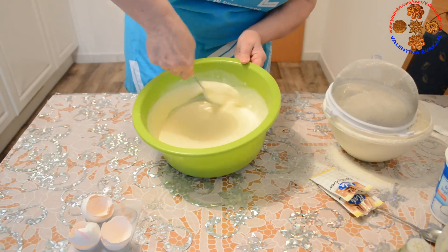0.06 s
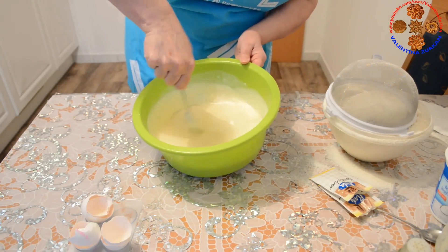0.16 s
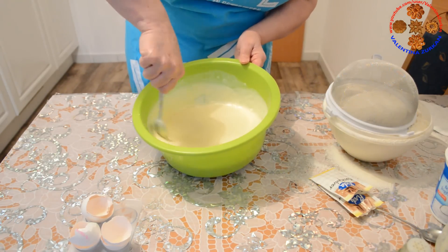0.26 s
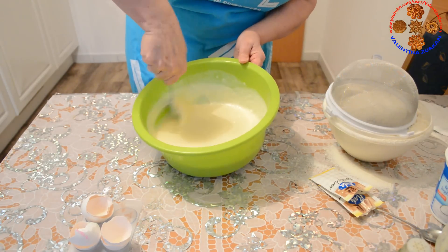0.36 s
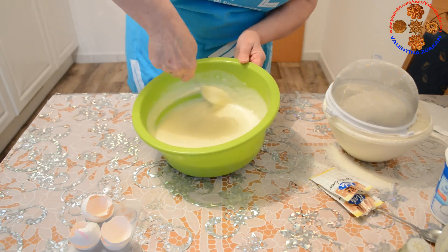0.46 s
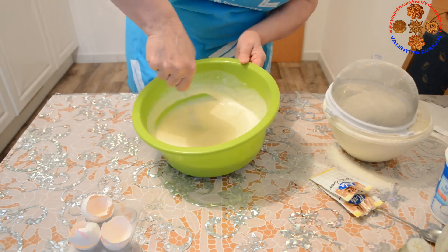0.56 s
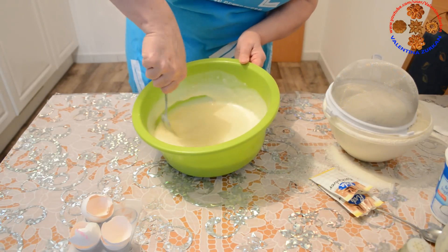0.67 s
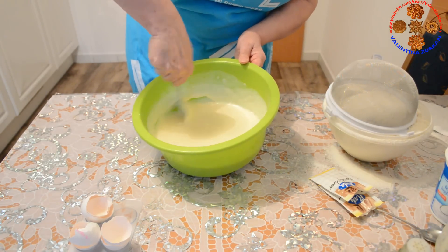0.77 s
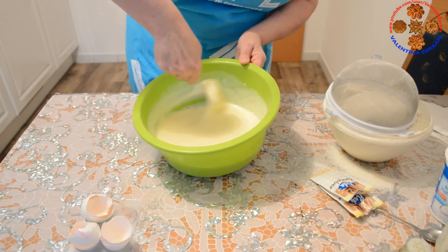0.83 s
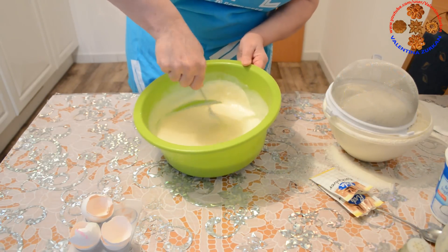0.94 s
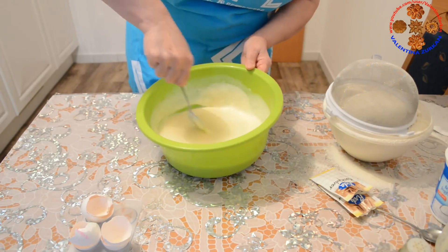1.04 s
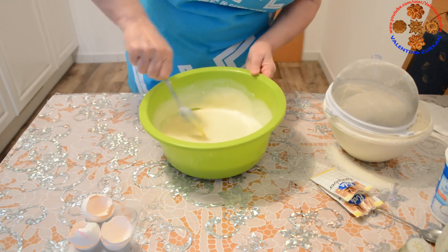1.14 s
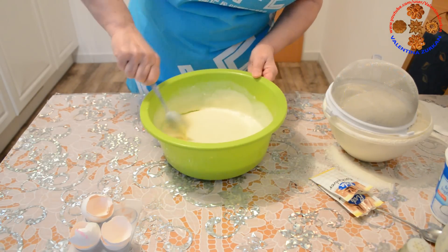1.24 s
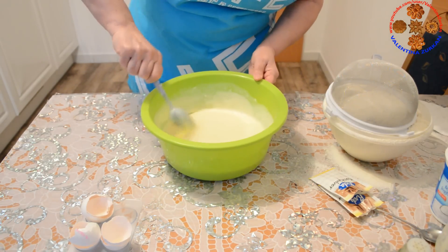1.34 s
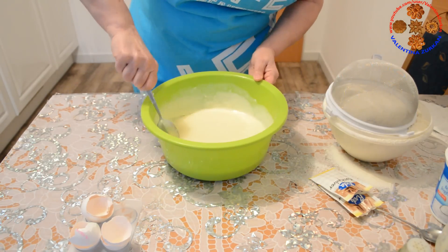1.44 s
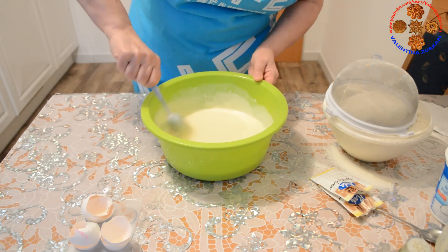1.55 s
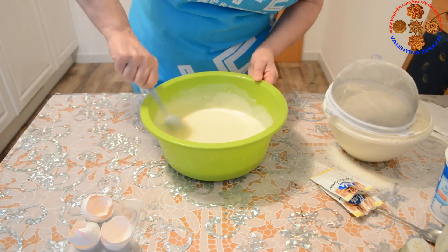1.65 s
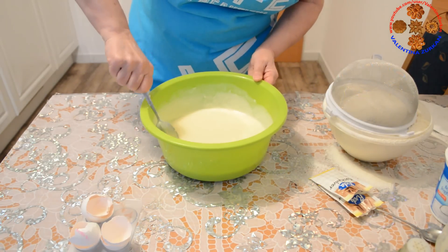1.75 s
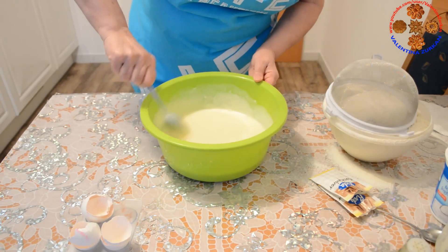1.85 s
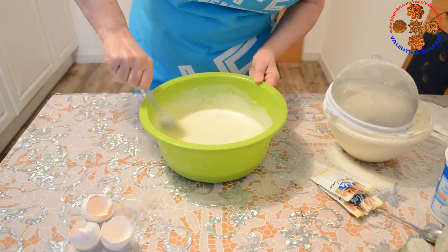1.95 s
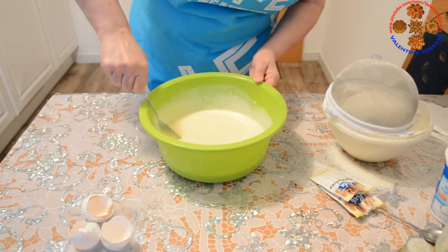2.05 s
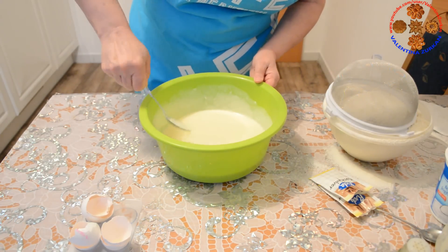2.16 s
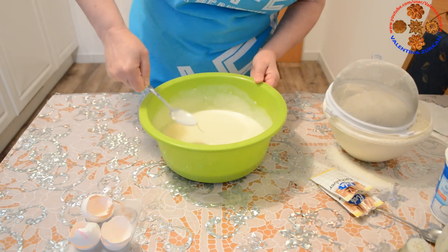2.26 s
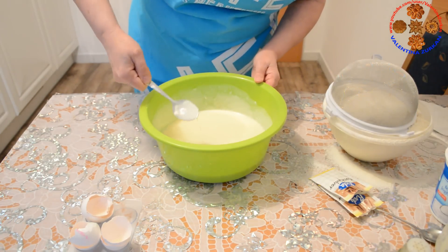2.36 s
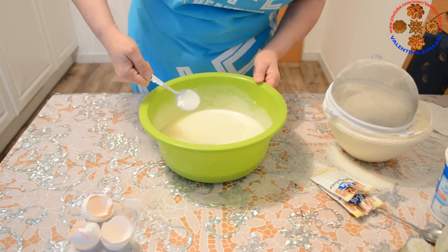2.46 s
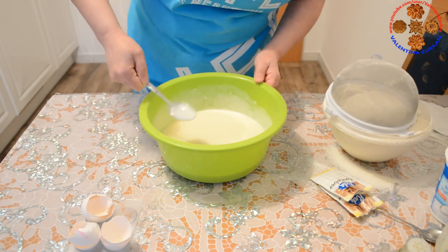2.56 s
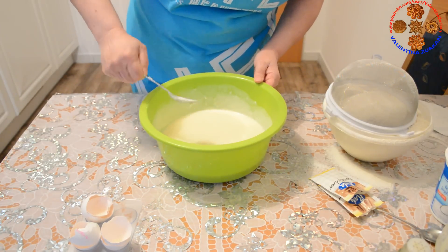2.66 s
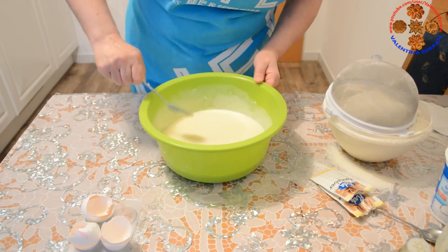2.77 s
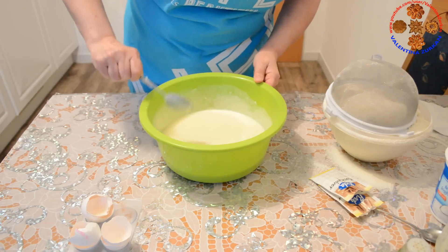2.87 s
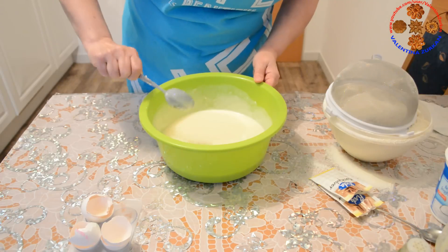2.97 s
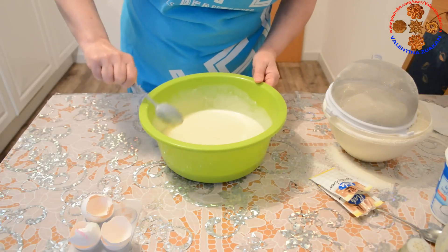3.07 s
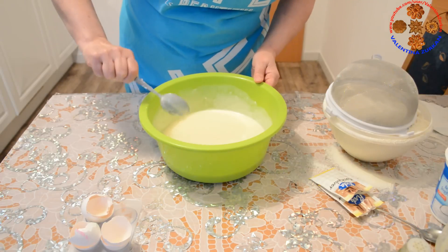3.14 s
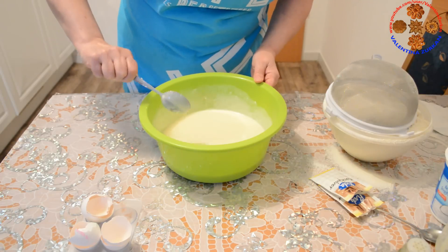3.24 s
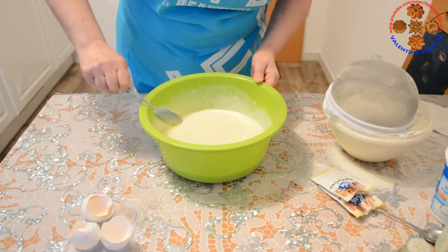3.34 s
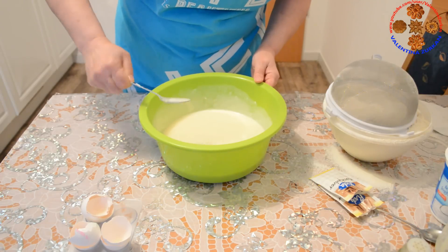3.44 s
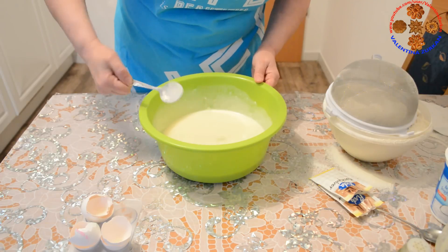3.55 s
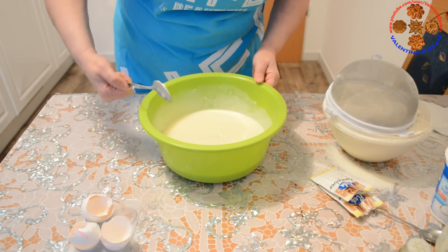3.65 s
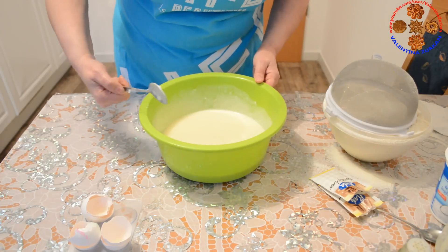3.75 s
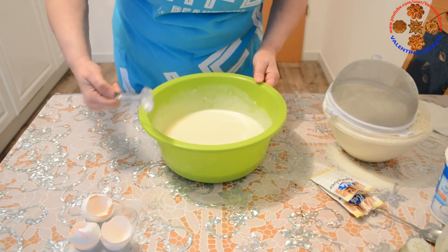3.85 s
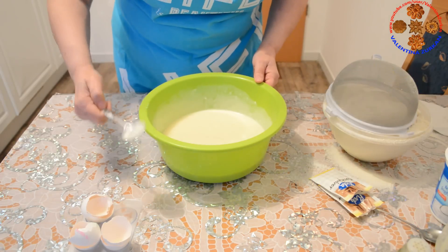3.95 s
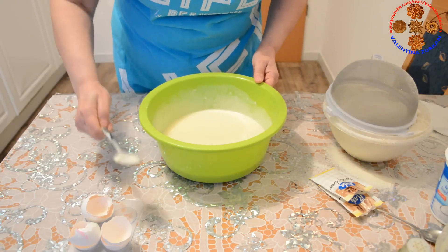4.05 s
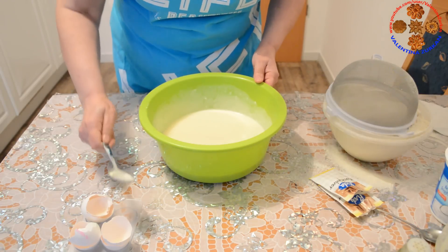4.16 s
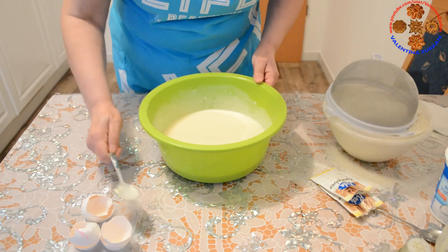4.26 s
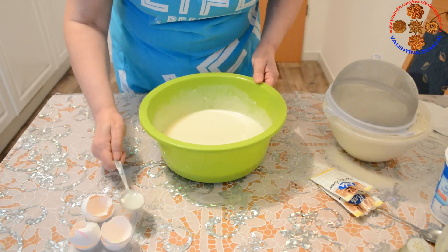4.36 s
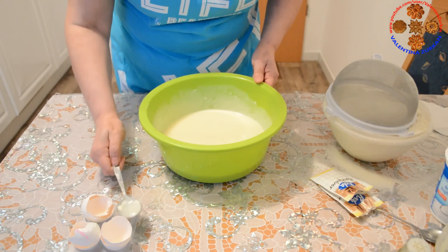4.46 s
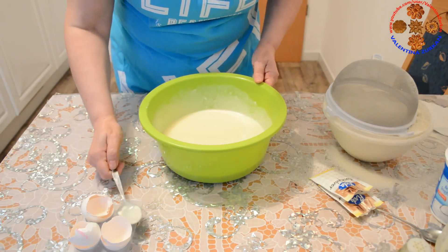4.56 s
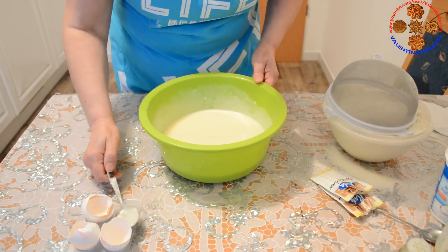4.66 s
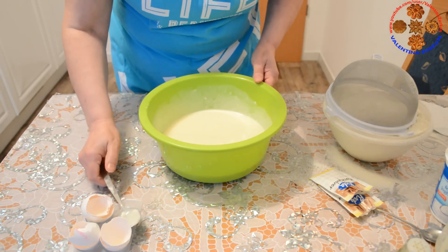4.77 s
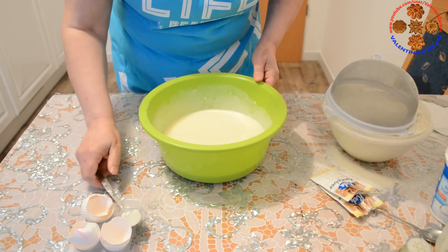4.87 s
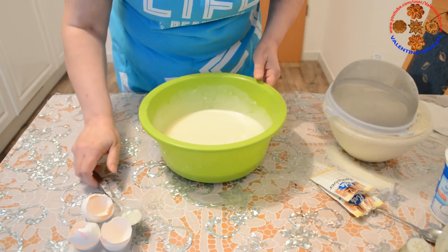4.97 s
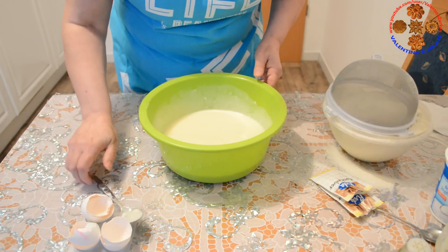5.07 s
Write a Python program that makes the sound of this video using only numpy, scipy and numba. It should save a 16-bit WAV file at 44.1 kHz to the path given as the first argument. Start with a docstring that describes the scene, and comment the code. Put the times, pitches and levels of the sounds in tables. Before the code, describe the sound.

Close, slightly overloaded sound of a spoon stirring batter: raspy scrapes and clacks against a plastic bowl, then a steady run of six sharp rim knocks. After a short gap come three fuller, hollow knocks, near silence, and a bright double metallic clink as the spoon is laid down. Short bright room echoes over quiet hum and hiss.

```python
"""A hard-walled kitchen: a metal spoon stirs batter in a plastic bowl, scraping and knocking its wall,
is wiped on the rim and rapped there in two bursts, then laid on the table.
Blows ring decaying modes with filtered-impulse cracks; scrapes and wipes are shaped noise grains and noise.
Each part of a blow has its own noise-built echoes, over a quiet appliance drone, hum and hiss.
A limiter and clipping flatten the loudest raps."""
import sys
import numpy as np
from scipy import signal
from scipy.fft import rfft, irfft
from scipy.io import wavfile
from scipy.ndimage import uniform_filter1d
from numba import njit

SR = 44100
rng = np.random.default_rng(int(sys.argv[2]) if len(sys.argv) > 2 else 0)


def bounce(signal):
    """Save signal as a 16-bit WAV file at the path given by the first command-line argument."""
    frames = np.transpose(np.atleast_2d(signal))
    limited = np.clip(frames, -1, 1)
    pcm = np.round(limited * 32767).astype(np.int16)
    wavfile.write(sys.argv[1], SR, pcm)


N = 225305  # length [samples]

BOTTOM, WALL, NEAR_RIM, FAR_RIM = range(4)  # where the spoon meets the bowl
BOWL_END, HANDLE = range(2)  # which end of the spoon lands
# every part of a blow leaves in its own direction, so each row meets its own set of echoes
EVEN_MODES, ODD_MODES, KNOCK, SNAP, REBOUND, RUB = range(6)


def undb(db):
    """Decibels to gain."""
    return 10 ** (np.asarray(db) / 20)


def level(x, db):
    """Scale to an rms level in dB."""
    return x * undb(db) / np.sqrt(np.mean(x ** 2))


def band(x, hz, width_hz):
    """Two-pole resonance, gain 1 at the centre."""
    return signal.lfilter(*signal.iirpeak(hz, hz / width_hz, SR), x)


def colour(x, table):
    """Shape the spectrum by (frequency [Hz], gain [dB]) points joined on a log-frequency axis."""
    hz, db = np.transpose(table)
    f = np.arange(len(x) // 2 + 1) * SR / len(x) + 1
    gain = undb(np.interp(np.log(f), np.log(hz), db))
    return irfft(rfft(x) * gain, len(x))


def add(track, sound, s):
    """Mix a sound in at time s, cut off at the end of the scene."""
    i = int(s * SR)
    track[..., i:i + sound.shape[-1]] += sound[..., :N - i]


def decay_over(t, t60):
    """Exponential decay that falls 60 dB in t60 seconds."""
    return np.exp(-np.log(1000) * t / t60)


def swell(touch, hardest, lift, db, rise_db, fall_db):
    """Gain that climbs to a peak and falls, in dB per second, while there is contact."""
    t = np.arange(N) / SR
    slope = np.where(t < hardest, rise_db * (t - hardest), fall_db * (hardest - t))
    contact = (t >= touch) * (t < lift)
    return uniform_filter1d(undb(db + np.maximum(slope, -120)) * contact, size=200)


def ring(hz, t60, db):
    """Decaying modes, weighted, tuned and phased a little differently each time; two rows, summed peak 1."""
    t = np.arange(SR // 2) / SR
    scatter = rng.standard_normal((len(hz), 3))
    gain = undb(db + 1.12 * scatter[:, 0])
    pitch = hz * (1 + 0.011 * scatter[:, 1])
    phase = 2 * np.pi * np.outer(pitch, t) + np.pi * scatter[:, 2:]
    modes = gain[:, None] * np.sin(phase) * decay_over(t, t60[:, None])
    modes = modes * np.minimum(t / 0.00062, 1)  # the push takes a moment
    rows = np.array([modes[::2].sum(axis=0), modes[1::2].sum(axis=0)])
    return rows / np.abs(modes.sum(axis=0)).max()


def crack(hz, width):
    """One sharp push through modes too dense to ring at a pitch; width as a share of the centre; peak 1."""
    push = signal.unit_impulse(SR // 50)
    y = band(band(push, hz, width * hz), hz, width * hz)
    return rng.choice([-1, 1]) * y / np.abs(y).max()


@njit
def sweep(x, hz, q):
    """State-variable band-pass whose centre moves."""
    y, b, l = np.empty(len(x)), 0., 0.
    for i in range(len(x)):
        g = np.tan(np.pi * hz[i] / SR)
        v = (b + g * (x[i] - l)) / (1 + g * (g + 1 / q))
        b, l, y[i] = 2 * v - b, l + 2 * g * v, v / q
    return y


@njit
def follow(x, attack, release):
    """Envelope that rises fast and falls slowly."""
    y, e = np.empty(len(x)), 0.
    for i in range(len(x)):
        e += (abs(x[i]) - e) * (attack if abs(x[i]) > e else release)
        y[i] = e
    return y


# colour of the air and hiss: (frequency [Hz], relative gain [dB])
HISS_COLOUR = [(15, -54), (25, -28), (53, -7.5), (87, -15), (114, -13.5), (394, -10.5), (754, -11.5),
               (962, -14.5), (1890, -14), (2910, -17.5), (3430, -17), (13600, -23), (16000, -31)]
# appliance drone: (centre [Hz], width of each of two filter passes [Hz], rms level [dB])
DRONE_BANDS = [(119.2, 7.8, -70.5), (249, 25, -76), (944, 41, -67.5), (1116, 130, -63.5),
               (2303, 100, -71.5), (2880, 250, -64.5), (5060, 790, -71)]
HISS_DB = -55.5
MAINS_HZ, MAINS_DB = 59.8, -67.5


def background():
    """Coloured noise for room air and hiss, a sine for mains hum, narrow noise bands for an appliance."""
    hiss = level(colour(rng.standard_normal(N), HISS_COLOUR), HISS_DB)
    hum = level(np.sin(2 * np.pi * MAINS_HZ * np.arange(N) / SR), MAINS_DB)
    drone = np.zeros(N)
    for hz, width_hz, db in DRONE_BANDS:
        narrow = band(band(rng.standard_normal(N), hz, width_hz), hz, width_hz)
        drone += level(narrow, db)
    return hiss + hum + drone


# echoes of the kitchen: (frequency [Hz], decay t60 [s], relative level [dB])
ROOM_DECAY = [(74, 0.91, -18), (220, 0.75, 2.5), (520, 0.58, 11), (1362, 0.43, 9), (3430, 0.4, 10.5),
              (10200, 0.33, 2), (17300, 0.17, 9)]
ROOM_DB = -5.5


def echoes():
    """Quick glances off table and bowl, then dense echoes that die band by band."""
    t = np.arange(SR) / SR
    hz, t60, db = np.transpose(ROOM_DECAY)
    late = 0
    for centre in 60 * 2 ** np.arange(0, 8.1, .5):  # half-octave bands
        edges = centre * 2 ** np.array([-.25, .25])
        bandpass = signal.butter(2, edges, "band", fs=SR, output="sos")
        noise = signal.sosfilt(bandpass, rng.standard_normal(SR))
        band_t60 = np.interp(np.log(centre), np.log(hz), t60)
        band_db = np.interp(np.log(centre), np.log(hz), db)
        late = late + undb(band_db) * noise * decay_over(t, band_t60)
    onset = np.clip((t - .0006) / 0.005, 0, 1)
    glances = 1 + undb(24.5) * decay_over(t, 0.011)  # early boost, gone within milliseconds
    return undb(ROOM_DB) * late * onset * glances / np.sqrt(np.sum(late ** 2))


def kitchen(dry):
    """Hard walls answer: each direction is convolved with its own echoes."""
    return sum(signal.fftconvolve(part, echoes())[:N] for part in dry)


# batter wiped softly off on the rim: (touch [s], hardest [s], lift [s], peak level [dB])
RIM_WIPES = [(2.734, 2.818, 2.96, -51.5), (3.776, 3.804, 3.89, -49)]
WIPE_RISE_DB_PER_S, WIPE_FADE_DB_PER_S = 238.5, 149


def wipe():
    """Soft rubbing as a smear of noise in the bowl's middle register."""
    smear = level(band(rng.standard_normal(N), 1600, 1400), 0)
    return smear * sum(swell(*row, WIPE_RISE_DB_PER_S, WIPE_FADE_DB_PER_S) for row in RIM_WIPES)


# spoon edge dragged along the wall: (touch [s], hardest [s], lift [s], peak level [dB],
# first ring of the edge [Hz], ring of the wall [dB re peak])
SCRAPE_STROKES = [(0, -0.009, 0.18, -34.5, 8300, -4.5), (0.05, 0.112, 0.11, -33.5, 7500, 0),
                  (0.25, .25, 0.31, -54, 8600, 2), (0.39, 0.414, 0.48, -27, 9220, -8.5),
                  (0.51, 0.542, 0.5367, -26, 7900, -37), (0.836, 0.86, 0.92, -30.5, 8250, -38),
                  (0.894, 0.89, .925, -38, 9250, -32)]
# the edge catches and slips: (time [s], peak level [dB], centre [Hz])
EDGE_SLIPS = [(0.0807, -23, 9200), (0.1015, -42, 6100), (0.2504, -25.5, 9400), (0.2676, -30, 6570),
              (0.4213, -2.5, 5940), (0.443, -7, 9000), (0.444, -12, 6000), (0.455, -3.5, 8400),
              (0.4708, -9, 6000), (0.4785, -13, 4500), (0.481, -8, 6000), (0.499, -12, 3400),
              (0.5163, -27, 7230), (0.5286, -21, 7170), (0.5332, -18, 6760), (0.538, -23, 6000),
              (0.858, -12, 6600), (0.8977, -15, 10200), (4.416, -30.5, 12000), (4.968, -67.5, 4540),
              (5.0757, -32, 3970)]
# colour of the rasp: (frequency [Hz], relative gain [dB])
RASP_COLOUR = [(1180, -24), (2000, 2.5), (3400, 0), (4610, -17), (6530, -1), (10500, 7), (12500, -23),
               (14800, -4), (16000, -25)]
PRESS_DB_PER_S, EASE_DB_PER_S = 350, 188
CHATTER_MS, CHATTER_DB = 2.5, 3
EDGE_DB, EDGE_SAG_HZ_PER_S = 0, 34000


def scrape():
    """Dense stick-slip grains of uneven size ring the spoon's edge and the bowl wall; single slips click out."""
    t = np.arange(N) / SR
    pressure, wall_gain, edge_hz = np.zeros(N), np.zeros(N), np.zeros(N)
    for touch, hardest, lift, db, hz, wall_db in SCRAPE_STROKES:
        push = swell(touch, hardest, lift, db, PRESS_DB_PER_S, EASE_DB_PER_S)
        pressure = pressure + push
        wall_gain = wall_gain + undb(wall_db) * push
        edge_hz = np.where(t >= touch, hz - EDGE_SAG_HZ_PER_S * (t - touch), edge_hz)
    size_db = 2.4 * np.minimum(rng.exponential(size=N), 3)
    is_grain = rng.random(N) < .2
    grains = rng.standard_normal(N) * undb(size_db) * is_grain
    # the edge chatters: contact comes in uneven patches
    patch = int(CHATTER_MS * SR / 1000)
    chatter = np.repeat(rng.standard_normal(N // 40), patch)[:N]
    grains = grains * uniform_filter1d(undb(CHATTER_DB * chatter), size=40)
    rasp = level(colour(grains, RASP_COLOUR), 0)
    edge = level(sweep(grains, np.clip(edge_hz, 5500, 14000), 1.1), EDGE_DB)
    wall = np.zeros(N)
    for row in BOWL_MODES:
        hz, t60, wall_db = row[0], row[1], row[2 + WALL]
        if hz > 900:  # grains drive only the upper wall modes
            wall += undb(wall_db) * band(grains, hz, np.log(1000) / (np.pi * t60))
    out = pressure * (rasp + edge) + wall_gain * level(wall, 0)
    for s, db, hz in EDGE_SLIPS:
        add(out, undb(db) * crack(min(hz, 12000), 1.0), s)
    return out


# spoon laid down, bowl end, then handle in two touches, and let go:
# (time [s], end, blow level [dB], contact time [ms], snap [dB re blow])
SPOON_DROPS = [(4.679, BOWL_END, 3.5, 0.14, 4.5), (4.740, HANDLE, 6, 0.37, 3.5),
               (4.7416, HANDLE, 1, 0.12, 1), (5.09, HANDLE, -34.5, 1, 5.5)]
# spoon and table modes: (frequency [Hz], decay t60 [s], relative level when the bowl end lands [dB],
# relative level when the handle lands [dB])
SPOON_MODES = [(242, 0.04, -11.5, -14.5), (560, 0.016, -14, -14.5), (1180, 0.019, -14, -8),
               (1660, 0.022, -11, 3), (1850, 0.015, -25, -3), (2310, 0.021, -9, 3), (2570, 0.021, -3, -3),
               (2765, 0.017, 1, -2.5), (4150, 0.016, -14, -8), (4370, 0.027, -3, -2),
               (5970, 0.024, -7.5, 5), (6240, 0.019, -0.5, -3), (6080, 0.019, -3.5, 10),
               (6780, 0.017, 1, 9.5), (7830, 0.016, 7.5, 7.5), (8810, 0.013, 9.5, 7), (9440, 0.02, 10, 10),
               (10250, 0.0074, 10, 16), (11360, 0.0078, -12, 16)]


def spoon():
    """The spoon chinks on the table as decaying modes; a longer contact dulls it."""
    out = np.zeros((RUB + 1, N))
    hz, t60, *weights = np.transpose(SPOON_MODES)
    for k, (s, end, db, contact_ms, snap_db) in enumerate(SPOON_DROPS):
        # one-pole low-pass with its corner at 1 / contact time
        keep = np.exp(-1000 / (SR * max(contact_ms, .01)) * 2 * np.pi)
        chink = signal.lfilter([1 - keep], [1, -keep], ring(hz, t60, weights[end]))
        add(out[:KNOCK], undb(db) * chink / np.abs(chink.sum(axis=0)).max(), s)
        # successive snaps leave in different directions
        add(out[KNOCK + k % 3], undb(db + snap_db) * crack(4000, 2.5), s)
    return out


# spoon on the bowl: (time [s], spot, blow level [dB], thump [dB], brightness [dB per octave],
# snap [dB re blow], rebound [dB re snap])
BOWL_BLOWS = [(0.229, BOTTOM, -25.5, -5, -12, -11, -9), (.375, WALL, -8, 6.5, -0.5, 4.5, 1),
              (.806, WALL, -9, 4.5, -8, 5.5, -15.5), (1.0094, BOTTOM, -22, -11, 3.5, 3.5, 13.5),
              (1.396, NEAR_RIM, 5.5, -9, -5.5, -5, 4.5), (1.5454, NEAR_RIM, 3.5, 4.5, 2.2, 8.5, -4),
              (1.6956, NEAR_RIM, 1.5, 4, 3.5, 11, -8.5), (1.8456, NEAR_RIM, 5.5, -1, -0.7, 5, -4),
              (1.9906, NEAR_RIM, 6.5, -1.2, 0, 5.5, -4), (2.1531, NEAR_RIM, 5.5, -2.5, 0, 2.5, -15.5),
              (3.1341, FAR_RIM, 9.5, 5, 1.3, -7, -3), (3.2892, FAR_RIM, 4.5, 4, 2.3, -5, -6.5),
              (3.4306, FAR_RIM, 8.5, 5, -1, -8.5, -3), (4.581, BOTTOM, -46.5, 2.5, -9, -18, -14)]
# bowl modes: (frequency [Hz], decay t60 [s], relative level when struck at
# bottom [dB], wall [dB], near rim [dB], far rim [dB])
BOWL_MODES = [(134.4, 0.63, -40, -46.5, -19.5, -24.5), (155, 0.6, -34.5, -37, -21, -32.5),
              (201.3, 0.18, -29, -42, -17, -20), (231.2, 0.36, -21, -46.5, -17, -22.5),
              (278, 0.32, -30, -16, -27.5, -23), (303, 0.09, -14.5, -28.5, -13.5, -25),
              (415, 0.025, -23, -6.5, -12.5, -7.5), (518, 0.047, -40, -13, -11.5, -6),
              (595.7, 0.061, -1, -19, -4.5, -11.5), (710, 0.047, 4.5, -10, -21, -39),
              (740, 0.0065, -20, 18, 6.5, -27.5), (1010, 0.033, -14, -19, -8, -36),
              (1093.5, 0.059, -11, 12.5, -2, -29.5), (1163, 0.061, -24.5, 9, 3, -7),
              (1232, 0.11, -9.5, -23, -14.5, -1.5), (1302, 0.04, -19, 11, -1.5, 7),
              (1351, 0.06, -11, -32, -9.5, 0), (1506, 0.012, -0.5, 16, -14, 12.5),
              (1612, 0.03, -37, 17, 7, 4.5), (1675, 0.042, -16.5, -35, 1.5, 8.5),
              (1850, 0.0055, 11.5, 17, 18.5, 10.5), (2112, 0.015, -4, -26, 1.5, 2.5),
              (2280, 0.014, -33, -44, 7.5, 7.5), (2636, 0.011, -3, 13, 8, 5.5)]
# dull knock under each blow: (bottom, wall, near rim, far rim) [dB re blow]
SPOT_KNOCK_DB = [-4, -5.5, -2.2, -4]
# time until the spoon bounces back: (bottom, wall, near rim, far rim) [ms]
SPOT_REBOUND_MS = [2.5, 1.5, 2, 2]
LOW_WALL_MODE, LINGER_DB = [4], -52.5  # row of the bowl modes, peak level
THUMP_HZ = 830  # the thump fades in over the octave below
BRIGHT_HZ = 1300  # brightness tilts the modes above this


def bowl():
    """Each blow rings the bowl's modes as struck at its spot, knocks, snaps, and rebounds once."""
    out, modes = np.zeros((RUB + 1, N)), np.array(BOWL_MODES)
    hz, t60 = modes[:, 0], modes[:, 1]
    # the low wall mode is faintly sounding at the start
    add(out[:KNOCK], undb(LINGER_DB) * ring(hz[LOW_WALL_MODE], t60[LOW_WALL_MODE], 0), 0)
    for s, spot, db, thump_db, bright_db, snap_db, rebound_db in BOWL_BLOWS:
        # a heavier blow also rocks the whole bowl on the table
        weights = modes[:, 2 + spot] + thump_db * np.clip(np.log2(THUMP_HZ / hz), 0, 1)
        # a harder edge favours the upper modes
        weights = weights + bright_db * np.log2(np.maximum(hz / BRIGHT_HZ, 1))
        again = s + SPOT_REBOUND_MS[spot] / 1000
        add(out[:KNOCK], undb(db) * ring(hz, t60, weights), s)
        add(out[:KNOCK], undb(db + min(rebound_db, 0) - 22.5) * ring(hz, t60, weights), again)
        add(out[KNOCK], undb(db + SPOT_KNOCK_DB[spot]) * crack(3760, 0.95), s)
        add(out[SNAP], undb(db + snap_db) * crack(8100, 1.33), s)
        add(out[REBOUND], undb(db + snap_db + rebound_db) * crack(10030, 0.52), again)
    return out


def scene():
    """Everything at the bowl and its echoes reach a small capsule, weak in deep bass and top treble."""
    dry = bowl() + spoon()
    add(dry[RUB], scrape() + wipe(), 0)
    capsule = signal.butter(3, [95, 12500], "band", fs=SR, output="sos")
    heard = signal.sosfilt(capsule, dry.sum(axis=0) + kitchen(dry))
    return (heard + background())[None]


def record(dry):
    """A limiter holds loud passages down, peaks clip, rumble and top are cut."""
    envelope = follow(dry[0], 1 / (0.0095 * SR), 1 / (0.059 * SR))  # attack 9.5 ms, release 59 ms
    gain = np.minimum(undb(-9.5) / (envelope + 1e-9), 1) ** 0.91
    clipped = np.clip(dry * gain, -.98, .98)
    rumble_cut = signal.butter(2, 60, "high", fs=SR, output="sos")
    top_cut = signal.ellip(9, .2, 80, 15700, fs=SR, output="sos")
    return signal.sosfilt(top_cut, signal.sosfilt(rumble_cut, clipped))


dry = scene()
out = record(dry)
bounce(out)
```